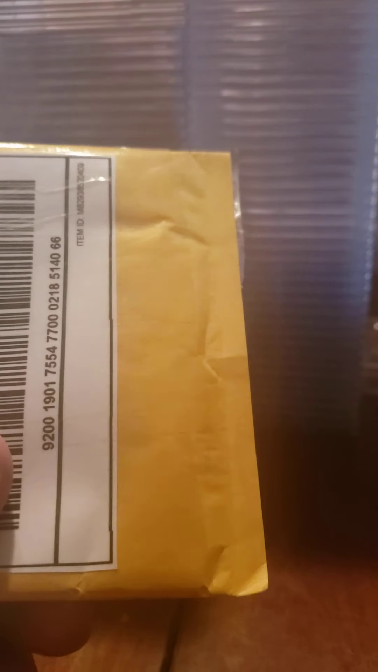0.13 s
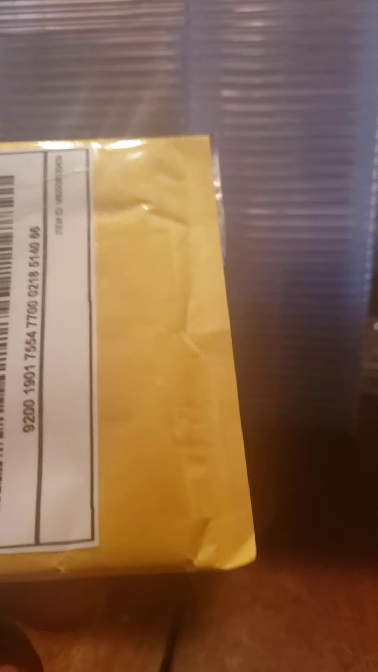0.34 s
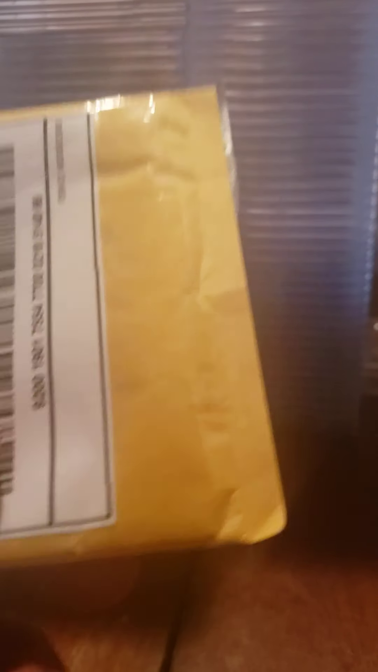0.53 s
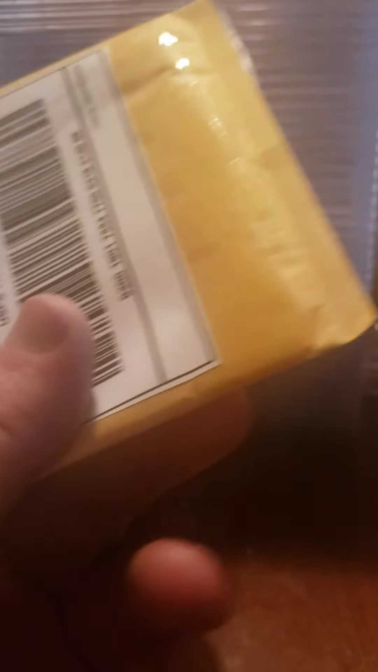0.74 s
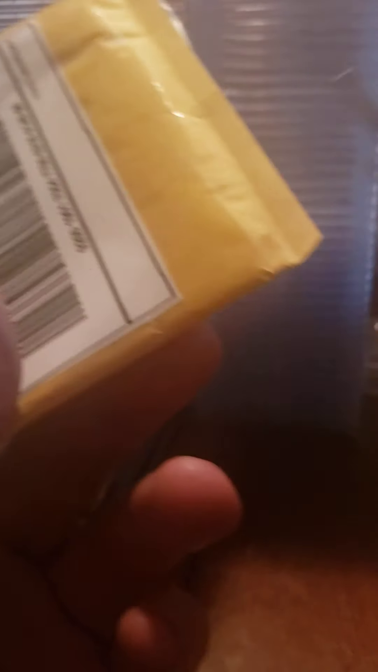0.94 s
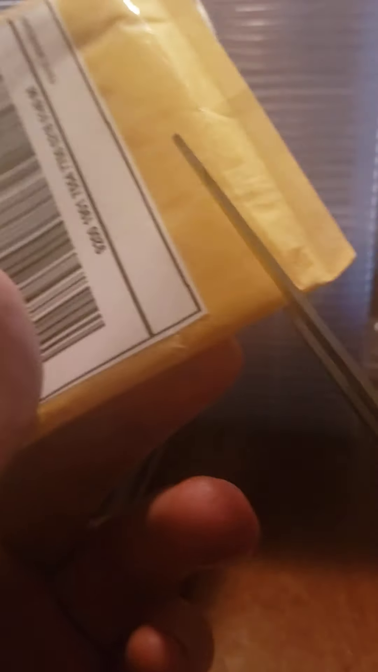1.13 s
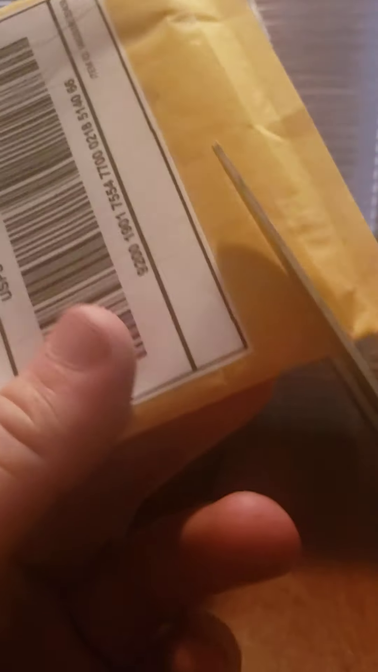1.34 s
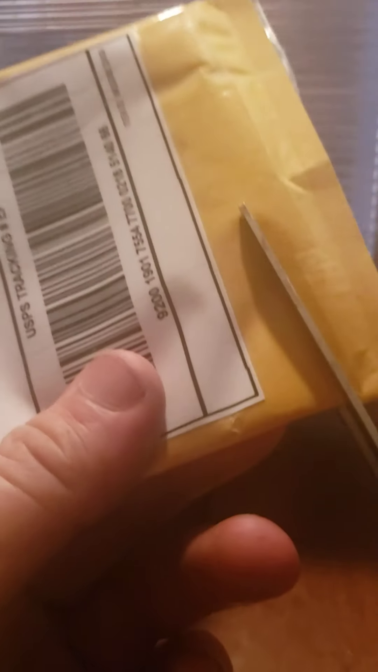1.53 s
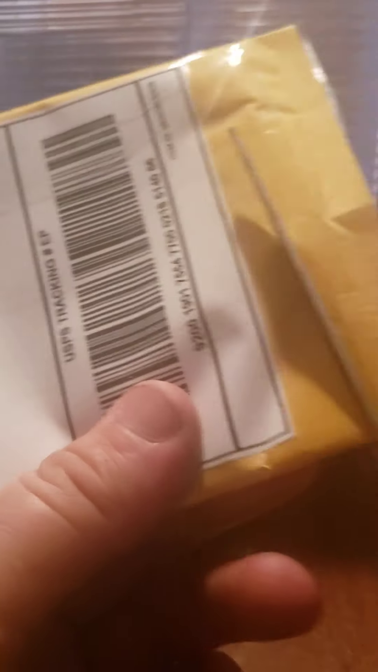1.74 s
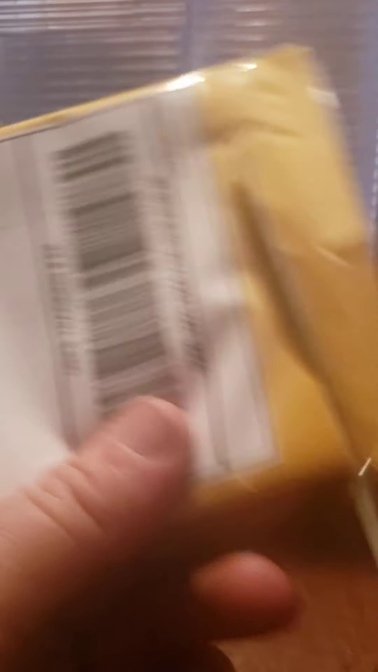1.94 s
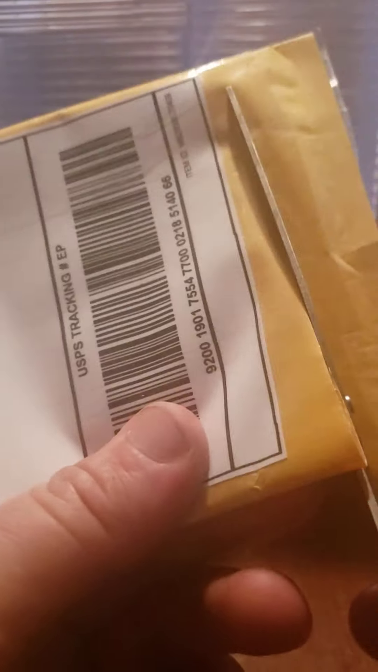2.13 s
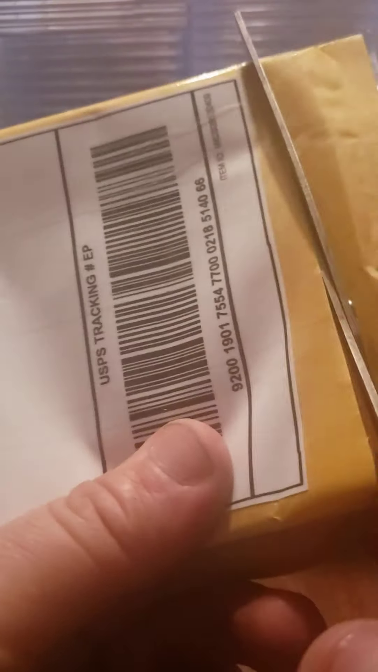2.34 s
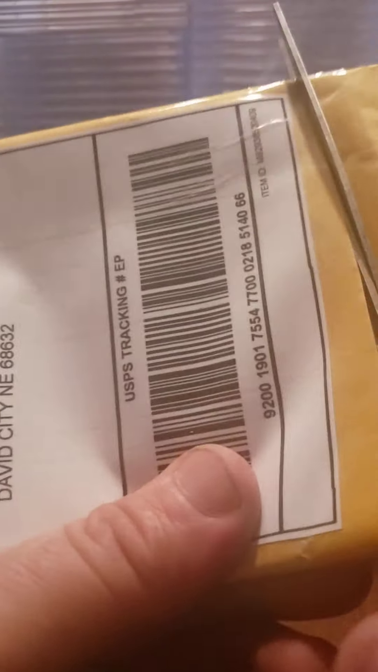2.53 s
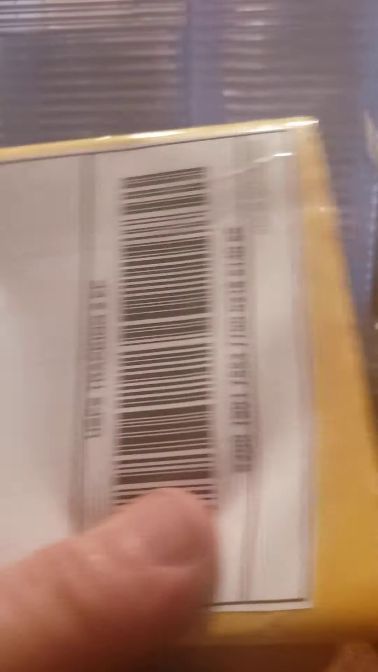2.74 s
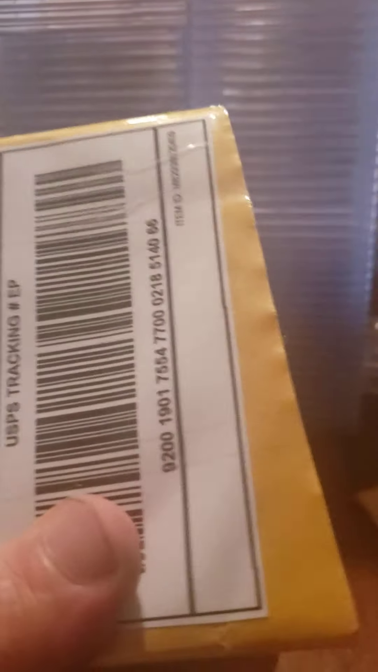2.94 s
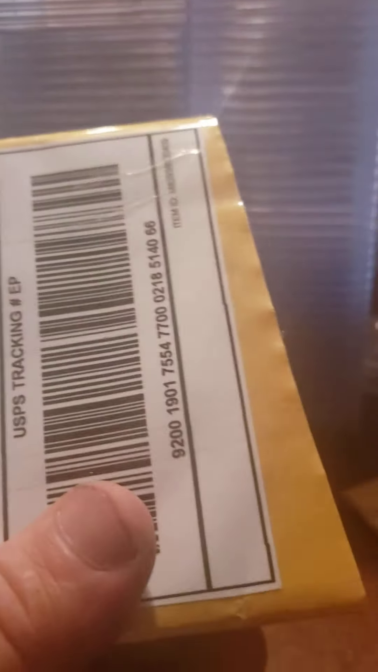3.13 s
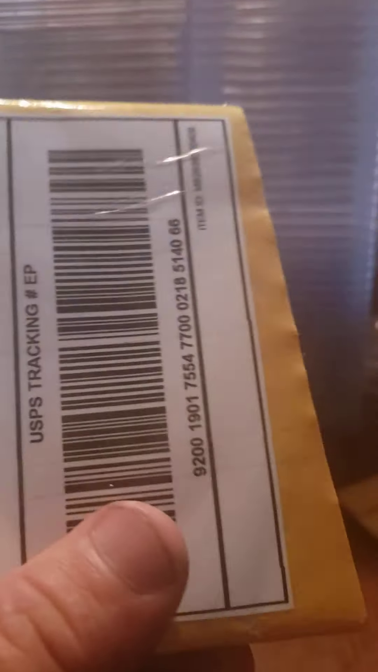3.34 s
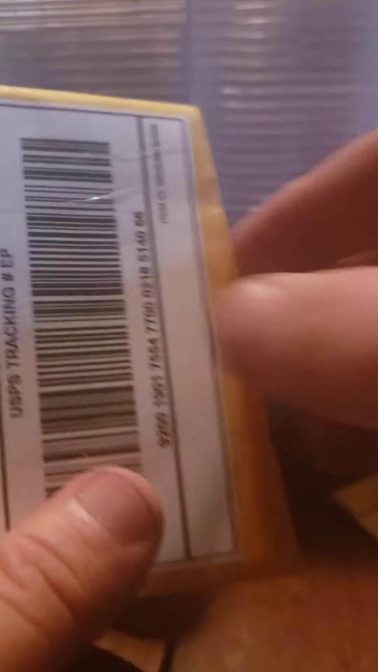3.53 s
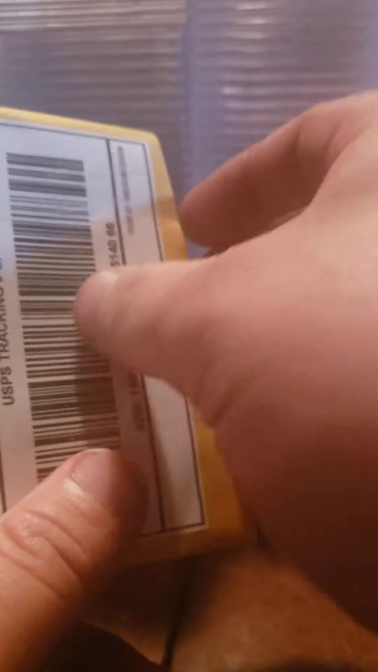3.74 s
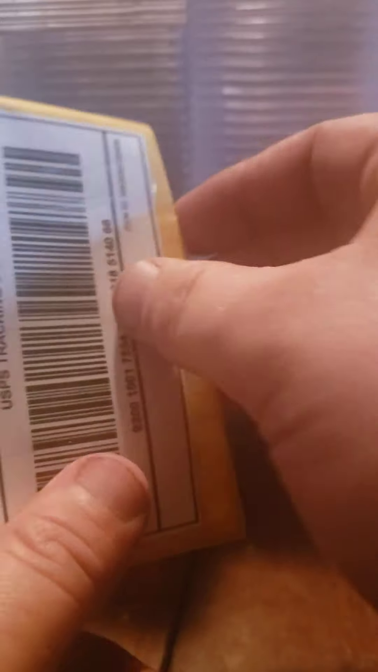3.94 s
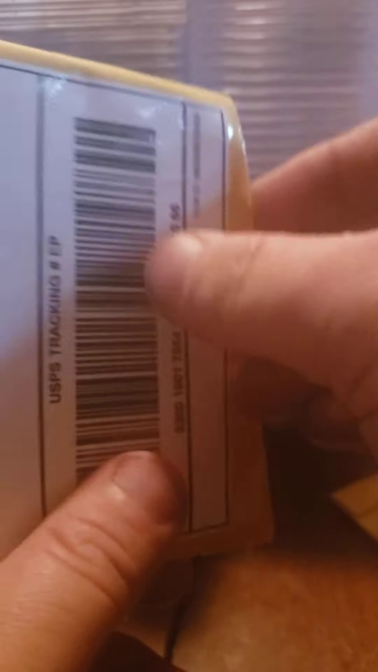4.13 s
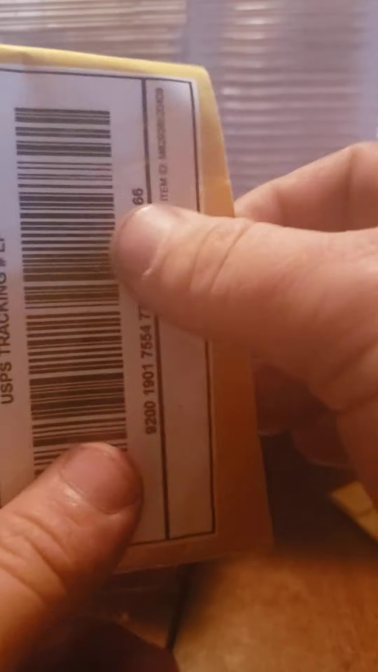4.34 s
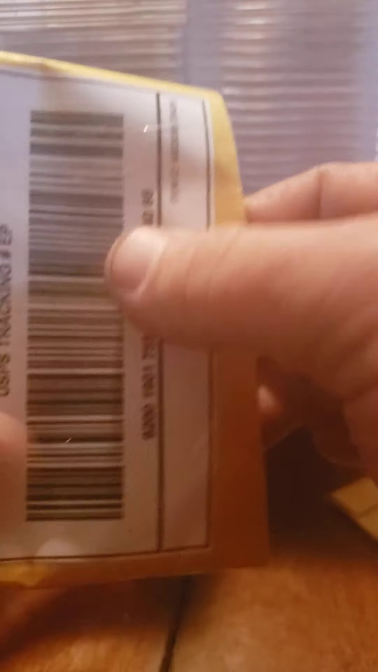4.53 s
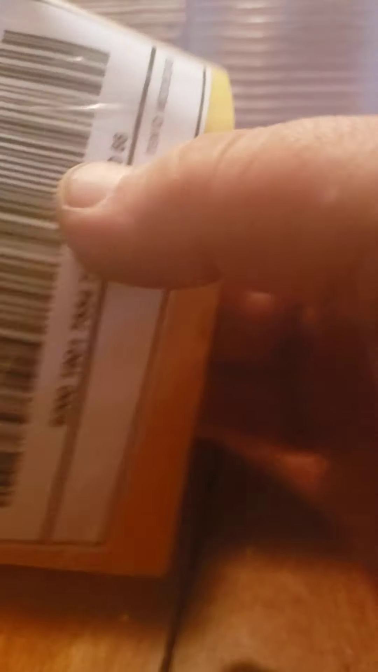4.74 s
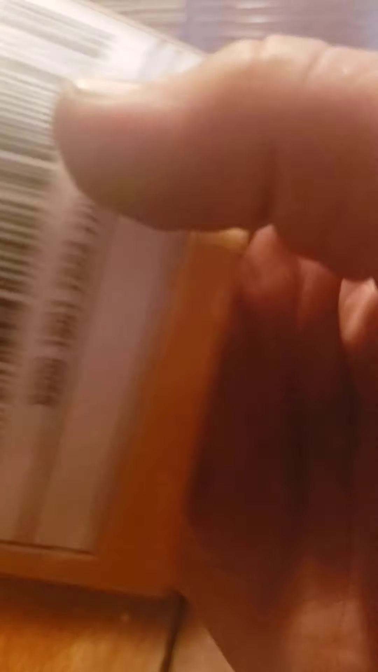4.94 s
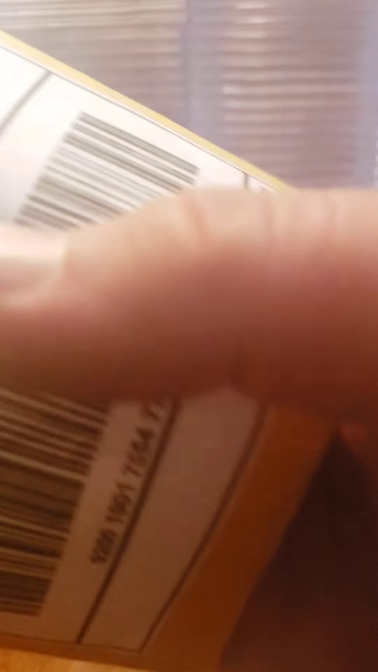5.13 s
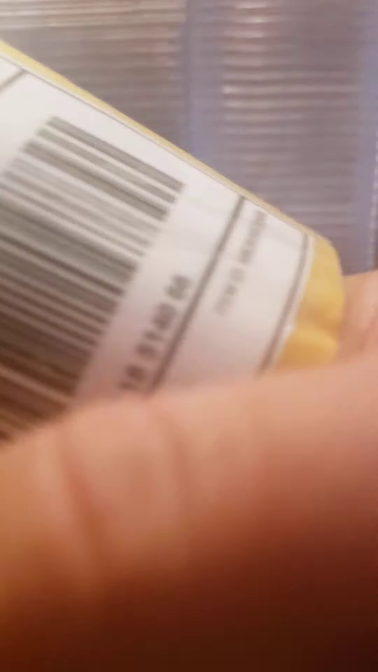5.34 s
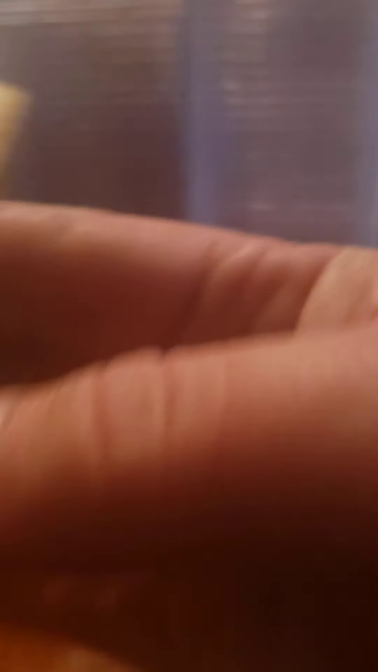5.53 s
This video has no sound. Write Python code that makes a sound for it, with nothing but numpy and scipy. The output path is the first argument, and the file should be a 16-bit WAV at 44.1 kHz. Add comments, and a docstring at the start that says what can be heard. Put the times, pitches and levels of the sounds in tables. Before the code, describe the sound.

Close, dry paper handling: soft crinkles, crunchy scissor cuts with two hard snaps, a metallic clack on wood, then heavier crackling and tugging.

```python
"""In a quiet room, close to a phone, a padded paper envelope is turned in the hands, cut open and pulled apart.
Shaped noise under random grains makes the hiss and rasp of fingers and scissors; folds crack in short bursts.
Resonances ring the hollow pouch, damped sines pop its wall and thump the grip, low noise carries the hands.
The scissors clatter onto a table through broad steel resonances; a short room tail and a steady hush lie behind."""
import sys
import numpy as np
from scipy import signal
from scipy.fft import rfft, irfft, next_fast_len
from scipy.io import wavfile
from scipy.ndimage import uniform_filter1d, map_coordinates

SR = 44100
rng = np.random.default_rng(int(sys.argv[2]) if len(sys.argv) > 2 else 0)


def volts_from_db(level):
    """Convert decibel levels to linear amplitude ratios."""
    exponent = np.asarray(level, float) / 20
    return 10 ** exponent


def transcribe(u):
    """Save the signal u as a 16-bit wav file named by the first command-line argument.

    u: samples, shape (n,) or (channels, n), limited to [-1, 1]; the rate is SR.
    q: integer samples, one column per channel.
    """
    v = np.clip(np.atleast_2d(u).T, -1, 1)
    q = np.round(v * 32767).astype(np.int16)
    wavfile.write(sys.argv[1], SR, q)


N = 246253
TIME = np.arange(N) / SR


def unit(x):
    """Scale to rms 1."""
    return x / np.sqrt(np.mean(x ** 2))


def colour(x, points):
    """Shape noise by (frequency [Hz], level [dB]) points, then scale to rms 1."""
    hz, db = np.transpose(points)
    size = next_fast_len(N)
    f = np.maximum(np.arange(size // 2 + 1) * SR / size, 1)
    gain = volts_from_db(np.interp(np.log(f), np.log(hz), db))
    return unit(irfft(rfft(x, size) * gain, size)[..., :N])


def ring(x, hz, width_hz):
    """Two-pole resonance, gain 1 at the centre."""
    return signal.lfilter(*signal.iirpeak(min(hz, .4 * SR), max(hz / width_hz, .3), fs=SR), x)


def pair(alike):
    """Noise for two microphone ports that share only a part."""
    a, b = rng.standard_normal((2, N))
    return np.array([a, alike * a + np.sqrt(1 - alike ** 2) * b])


def walk(rate):
    """Random levels that glide to a new value every 1 / rate s; spread a little under 1."""
    k = int(SR / rate)
    held = np.repeat(rng.standard_normal(N // k + 1), k)
    return uniform_filter1d(held, k)[:N]


def swell(t, rise_ms):
    """Grows to 1 in rise_ms, then dies away exponentially with the same time constant."""
    u = t * 1000 / np.clip(rise_ms, .1, 30)
    return u * np.exp(1 - u)


def grains(rate, spread_db, rise_s):
    """Envelope of many fibres letting go at random: most faint, a few strong."""
    when = rng.random(N) < rate / SR
    size = rng.exponential(size=N)
    t = np.arange(SR // 20) / SR
    releases = when * volts_from_db(spread_db * np.minimum(size, 3))
    return unit(np.convolve(releases, swell(t, 1000 * rise_s))[:N])


def stroke(t, start, end, start_db, end_db, grab_s, let_go_s):
    """Level of one drag: sets in, changes evenly in dB, lets go."""
    onset = 1 / (1 + np.exp(np.clip((start - t) / grab_s, -40, 40)))
    release = 1 / (1 + np.exp(np.clip((t - end) / let_go_s, -40, 40)))
    return onset * release * volts_from_db(np.interp(t, [start, end], [start_db, end_db]))


def add(out, s, sound):
    """Mix a short sound in at time s."""
    i = int(s * SR)
    out[:, i:i + sound.shape[-1]] += sound[..., :N - i]


# how busy the fingers are and how hard they press: (time [s], hiss level [dB], pressure [dB])
HANDLING = [(0, -53.5, -1), (.12, -61.5, 0), (.3, -55, -0.5), (.5, -61, -3.5), (.76, -63, 2.5),
            (.95, -66, 0), (1.04, -68.5, -19), (1.17, -82, -10), (1.21, -67, -10), (1.3, -57.5, -8.5),
            (1.43, -54.5, -29), (1.62, -63, -38), (1.95, -54.5, -6.5), (2.45, -59, -4.5), (2.64, -46, -17),
            (2.8, -53, -11), (3.15, -64, -6), (3.3, -56.5, 0), (3.57, -72.5, -1), (3.95, -65.5, -4),
            (4.17, -58, 0), (4.3, -60, -4.5), (4.7, -49.5, -4), (4.81, -49.5, -7), (5.1, -48, -7),
            (5.35, -54.5, 1.5), (5.47, -47, -9.5), (5.58, -43.5, -11)]
# a finger drags over the paper: (start [s], end [s], level at start [dB], level at end [dB], pressure [dB])
RUBS = [(0.213, 0.292, -59, -59, -2), (.307, 0.317, -38, -35.5, -7), (0.373, 0.418, -52.5, -49, -5),
        (0.384, .406, -51, -57.5, 12), (0.407, 0.436, -57, -49, -7), (0.776, 0.834, -51.5, -56.5, -5.5),
        (2.887, 2.979, -50, -65.5, -4), (3.02, 3.117, -58.5, -63.5, 4.5),
        (3.619, 3.685, -63.5, -61.5, -15.5), (3.77, 3.814, -66.5, -55.5, -6.5),
        (3.832, 3.92, -67, -49.5, -11), (3.988, 4.031, -58.5, -58, 2), (4.05, 4.138, -50, -50.5, -2.5),
        (4.331, 4.415, -62, -46, 1), (4.411, 4.478, -44.5, -50, -3.5), (4.516, 4.595, -60.5, -64, 10),
        (4.625, 4.725, -73, -59, -5), (4.83, 4.939, -49, -51.5, 4), (4.967, 5.037, -48.5, -43, -1.5),
        (5.096, 5.245, -49, -48.5, -8), (5.258, 5.335, -47, -58.5, 5), (5.496, 5.592, -53, -65, 14)]


def fingers():
    """Gain of the fingers' hiss, and their pressure in dB: steady handling with drags on top."""
    s, hiss_db, press_db = np.transpose(HANDLING)
    gain = volts_from_db(np.interp(TIME, s, hiss_db) + 2.0 * walk(10))
    pressed = gain * np.interp(TIME, s, press_db)
    for start, end, start_db, end_db, drag_db in RUBS:
        drag = stroke(TIME, start, end, start_db, end_db, grab_s=0.002, let_go_s=0.0035)
        gain = gain + drag
        pressed = pressed + drag * drag_db
    return gain, pressed / gain


# skin on the glossy label is brighter than on bare paper: (time [s], sheen level over the hiss [dB])
SHEEN = [(0, -12), (.2, -8), (.3, -5.5), (.4, 3.5), (.55, -13), (.8, 6), (1.1, -23), (1.4, -24.5),
         (2.6, -6.5), (3.0, -5.5), (3.5, -15), (4.2, -12), (5.58, -11.5)]
# relative to the hiss; both grow with pressure, the hollow ring by HOLLOW_PER_DB dB for each dB
RASP_DB, HOLLOW_DB, HOLLOW_PER_DB = -1, -6.5, 0.72


def rustle(busy, press_db):
    """Uneven, grainy handling; the harder the grip, the more large crackles reach all three voices."""
    force_db = 20 * np.log10(busy) + press_db
    crackle = grains(90, 5.0, .0007) * np.interp(force_db, [-66, -48], [.3, 1.5])
    fine = (1 + .35 * grains(300, 4.0, .001) + .15 * crackle) * volts_from_db(1.5 * walk(40))
    middle = .7 + .3 * grains(150, 4.0, .0012) + .4 * crackle
    coarse = 0.48 + .5 * grains(75, 6.1, 0.00073) + 0.33 * crackle
    hiss, rasp, hollow = voices(fine, middle, coarse)
    sheen = unit(ring(ring(hiss, 12500, 8200), 12500, 8200))
    sheen = sheen * volts_from_db(np.interp(TIME, *np.transpose(SHEEN)))
    rasp = rasp * volts_from_db(RASP_DB + press_db)
    hollow = hollow * volts_from_db(HOLLOW_DB + HOLLOW_PER_DB * press_db)
    return busy * (ring(hiss, 4500, 9700) + sheen + rasp + hollow)


# tone of the fibres: (frequency [Hz], relative level per Hz [dB])
FIBRE = [(1470, -40), (2500, 0.5), (5050, 2), (6100, -1.5), (6600, 2.5), (8910, -3.5), (11700, 0),
         (15100, -1.5), (16100, -12.5), (16500, -51.5)]


def voices(fine, middle, coarse):
    """Hiss, rasp and hollow ring of dragged paper, each under its own stick-slip grain."""
    hiss = unit(colour(pair(0.18), FIBRE) * fine)
    rasp = ring(pair(0.12) * middle, 1790, 2000)
    rasp = unit(ring(rasp, 2000, 2200) + 0.42 * ring(rasp, 2300, 400) + 0.55 * ring(rasp, 1650, 300))
    return hiss, rasp, unit(pouch(ring(pair(0.92) * coarse, 510, 1100)))


# air and walls of the pouch: (frequency [Hz], width [Hz], level [dB])
POUCH = [(614, 110, -4.5), (749, 160, -5), (820, 67, -15)]


def pouch(x):
    """The hollow envelope answers any push with its resonances."""
    return sum(volts_from_db(db) * ring(x, hz, width) for hz, width, db in POUCH)


# the blades close through the paper:
# (start [s], end [s], level at start [dB], level at end [dB], hollow ring relative to the cut [dB])
CUTS = [(1.441, 1.494, -46.5, -44.5, -12.5), (1.471, 1.592, -38.5, -47.5, -12),
        (1.657, 1.751, -38.5, -40, -8), (1.769, 1.811, -47, -37.5, -12), (1.823, 1.895, -34.5, -38.5, -1.5),
        (1.985, 2.013, -41, -34, -4.5), (2.011, 2.051, -32, -35, -11.5), (2.086, 2.171, -36, -37, -4),
        (2.235, 2.302, -34.5, -36.5, -4), (2.32, 2.399, -29.5, -46, -5), (2.478, 2.512, -41.5, -39.5, -1),
        (2.545, 2.551, -30.5, -46, 0), (2.566, 2.563, -42, -30.5, 1.5), (2.579, 2.584, -43, -30, -6.5),
        (2.666, 2.713, -32.5, -50, -7)]
# stretched paper under the blades: (frequency [Hz], width [Hz], mid level [dB])
SING = [(2670, 100, -16.5), (4750, 350, -13.5), (6380, 250, -24.5), (11900, 1500, -8.5)]


def cuts():
    """Dense rasps that start and stop within a few ms; the stretched paper sings in a few bands."""
    fine = (1 + .45 * grains(300, 5.0, .0006)) * volts_from_db(1.6 * walk(150))
    middle = fine * volts_from_db(5.4 * walk(120))
    coarse = 0.25 + 1.4 * grains(94, 4.6, 0.0033)
    hiss, rasp, hollow = voices(fine, middle, coarse)
    sing = sum(volts_from_db(db + 7.17 * walk(3.7)) * unit(ring(pair(0.1), hz, width)) for hz, width, db in SING)
    edge, ringing = 0, 0
    for start, end, start_db, end_db, hollow_db in CUTS:
        close = stroke(TIME, start, end, start_db, end_db, grab_s=0.0027, let_go_s=0.0046)
        edge = edge + close
        ringing = ringing + close * volts_from_db(hollow_db)
    return edge * (hiss + sing + volts_from_db(-7) * rasp) + ringing * hollow


# folds that snap:
# (time [s], flap peak [dB], flap pitch [Hz], treble peak over the flap [dB], left minus right [dB])
CRACKS = [(0.21, -43, 5320, 2, -1.5), (0.2192, -36.5, 1830, -12, -6), (0.2488, -33, 1200, 6, -1.5),
          (0.308, -45, 1800, 5, -2.0), (0.4123, -26, 7480, 15.5, -3), (0.477, -44.5, 4960, -22, 8),
          (0.9443, -46, 4670, -2, 3.5), (1.037, -48, 4660, -24, 12), (1.185, -51, 3520, -26, 14),
          (1.297, -44.5, 3500, -22, 19), (1.4037, -39.5, 3985, -13, 6), (1.4214, -40, 2670, 0, 8),
          (1.479, -26, 2770, -14, 8), (1.5115, -26, 4590, 0, -4), (1.5436, -23.5, 2670, -13, 3),
          (1.8028, -35, 2810, 1, 2), (1.8402, -19.5, 2530, -10, 9), (1.8671, -17.5, 1420, -3, -3),
          (1.8873, -25.5, 1300, -10, 15), (2.1176, -17, 1270, -8, 5.5), (2.1421, -19.5, 2600, -14, 12),
          (2.1654, -28, 2670, -10, -1), (2.2713, -21, 1280, -11, 4), (2.3331, -25, 3660, -24, 11),
          (2.481, -39, 1470, -12, 8), (2.5371, -36, 1880, -12, -4), (2.5935, -29, 7610, -10, 10),
          (2.6143, -8.5, 5070, -0.5, 9), (2.6594, -9, 1960, -23, 9.5), (2.6629, -8, 2290, 5.5, 4),
          (2.818, -28.5, 2520, -11, 0.5), (2.886, -13, 8800, -9, -2), (3.0036, -22, 1710, -30, -6.0),
          (3.0238, -22, 8300, -24, 0.0), (3.0917, -35.5, 7120, -7, 0.0), (3.1835, -14, 2970, -22, -1),
          (3.7815, -42, 3520, -10, 4), (3.9005, -41, 6820, -16, 3.5), (4.0123, -43, 2220, -18, 2),
          (4.0675, -34, 2930, -14, -4), (4.1292, -30.5, 6030, -15, 5.0), (4.4164, -49, 2590, -10, 6),
          (4.4594, -45, 2540, -16, 2.5), (4.5388, -30, 2080, -1, 3.5), (4.574, -39, 2080, -16, 3),
          (4.582, -34, 1950, -13, 12), (4.633, -46, 2130, -19, 4), (4.656, -37, 2140, -14, 2),
          (4.8157, -31, 1530, -10, 7), (4.839, -22.5, 2530, -19, 7), (4.8532, -32, 1550, -19, 9),
          (4.8759, -20.5, 1410, -23, 9.5), (4.887, -27, 2760, -20, 10), (4.9175, -32, 1600, -16, 5),
          (5.1078, -22, 2740, -6, 21.5), (5.172, -42, 4580, -16, 5.0), (5.1879, -36, 1601, -10, 4.0),
          (5.2209, -23, 2410, -20, 13.5), (5.242, -28, 3560, -14, 9), (5.251, -34, 1680, -15, 9),
          (5.2754, -32, 1260, -31, -4), (5.2977, -23, 1630, -32, 17.5), (5.3275, -30, 1640, -27, 12),
          (5.3832, -32.5, 2200, -26, 22)]
RISE_MS, FASTER_PER_DB = 1.155, .02  # rise at -33 dB; harder snaps are quicker


def cracks(busy):
    """Each fold gives a few ms of noise, coloured by the flap that snaps, and a faint settling rustle."""
    out, t = np.zeros((2, N)), np.arange(SR // 20) / SR
    for s, peak_db, hz, top_db, pan_db in ticks(busy) + list(CRACKS):
        noise = rng.standard_normal((3, len(t)))
        snap = swell(t, RISE_MS * np.exp(-FASTER_PER_DB * (peak_db + 33)))
        settling = .04 * swell(t, 3.4)
        burst = (noise[0] + .5 * noise[1:]) * (snap + settling)
        flap = ring(ring(burst, hz, hz), hz, hz) + 0.24 * ring(burst, 4600, 6400)
        top = ring(burst, 12000, 6100)
        crack = flap / np.abs(flap).max() + volts_from_db(top_db) * top / np.abs(top).max()
        side = volts_from_db(np.array([[pan_db], [-pan_db]]) / 2)
        add(out, s, side * volts_from_db(peak_db) * crack)
    return out


# a slowly bent crease ticks densely, a crumpled one lower:
# (start [s], end [s], mid level [dB], mid pitch [Hz])
CREAKS = [(0.877, 1.13, -56, 4500), (1.298, 1.46, -47.5, 3870), (1.597, 1.65, -41.5, 4830),
          (2.41, 2.46, -40, 3460), (2.926, 3.0, -41, 4800), (4.151, 4.33, -46, 5000),
          (4.361, 4.48, -42, 1880), (4.847, 5.02, -30.5, 1470), (5.131, 5.3, -28.5, 1480)]
CREAK_PER_S = 55
# small creases that tick at random: mid level over the fingers' gain, spread either way, pitch, treble
TICK_OVER_HISS_DB, TICK_SPREAD_DB, TICK_HZ, TICK_TOP_DB = 11, 3, 4010, -7


def ticks(busy, count=40):
    """Rows for small creases: anywhere as loud as the fingers are busy, and densely in each creak."""
    s = rng.random(count) * (N - 1) / SR
    base_db = 20 * np.log10(busy[(s * SR).astype(int)]) + TICK_OVER_HISS_DB
    hz = np.full(count, float(TICK_HZ))
    for start, end, creak_db, creak_hz in CREAKS:
        when = np.arange(start, end, 1 / CREAK_PER_S)
        s = np.append(s, when + rng.random(len(when)) / CREAK_PER_S)
        base_db = np.append(base_db, creak_db + 0 * when)
        hz = np.append(hz, creak_hz + 0 * when)
    size, tone, lean = rng.random((len(s), 3)).T
    level_db = base_db + TICK_SPREAD_DB * (2 * size - 1)
    pitch_hz = hz * 2 ** (tone - .5)  # within half an octave either way
    return list(zip(s, level_db, pitch_hz, TICK_TOP_DB + 0 * s, 8 * lean - 2))


# the pouch wall pops in and out: (time [s], level [dB], pitch [Hz], rise [ms])
POPS = [(0.251, -42, 695, 2), (0.307, -36, 767, 3.64), (0.414, -33, 770, 3.88), (1.186, -50.5, 620, 1.5),
        (1.293, -48, 600, 2.7), (1.473, -42, 400, 2.9), (1.683, -44, 837, 2.8), (1.736, -38, 730, 2.6),
        (1.803, -39, 540, 2.4), (1.822, -32, 684, 2.6), (1.837, -26, 800, 2.2), (1.852, -23, 740, 1.85),
        (1.871, -24, 647, 1.7), (1.884, -34.5, 610, 3.5), (1.997, -35, 860, 2.9), (2.085, -34, 572, 3.4),
        (2.1, -32, 668, 2.2), (2.12, -19.5, 732, 2.2), (2.141, -23.5, 724, 1.6), (2.165, -33.5, 620, 2.8),
        (2.232, -38, 633, 2.4), (2.273, -24, 588, 1.9), (2.29, -41, 680, 2.1), (2.325, -30, 602, 1.9),
        (2.356, -39.5, 890, 2.3), (2.376, -35, 430.4, 1.9), (2.541, -38, 580, 1.9), (2.613, -26, 527, 2.1),
        (2.661, -21, 405, 1.87), (2.815, -47.5, 730, 2.1), (2.886, -40.5, 893, 2.2),
        (3.004, -41.5, 720, 3.3), (3.185, -38, 754, 2.44), (4.009, -45.5, 916, 2.25),
        (4.055, -40, 890, 2.7), (4.124, -29, 388, 2), (4.374, -35.5, 665, 2.5), (4.539, -33.5, 760, 2.3),
        (4.662, -38, 357, 2), (4.852, -34.5, 950, 2), (4.874, -35, 954, 1.64), (4.886, -33.5, 950, 2.4),
        (5.003, -33.5, 354, 2.7), (5.108, -34.5, 665, 1.85), (5.137, -43, 960, 2.1), (5.241, -33, 815, 2.7),
        (5.297, -25, 737, 1.96), (5.327, -30, 787, 2.7), (5.333, -33, 925, 1.9), (5.38, -38.5, 706, 1.3)]


def pops():
    """A few rough cycles of the air in the pouch: a swelling sine with narrow noise at its pitch."""
    out, t = np.zeros((2, N)), np.arange(SR // 10) / SR
    for s, level_db, hz, rise_ms in POPS:
        wobble = ring(rng.standard_normal(len(t)), hz, 320)
        tone = np.sin(2 * np.pi * hz * t) + 3.54 * wobble
        add(out, s, volts_from_db(level_db) * swell(t, rise_ms) * tone)
    return out


# a grip shifts and the whole envelope flexes: (time [s], level [dB], pitch [Hz], fade time constant [ms])
THUMPS = [(0.406, -50, 142, 62), (0.687, -45, 129, 37), (1.476, -57, 295, 50), (1.867, -52, 68.4, 19),
          (2.138, -47, 78, 14.0), (2.261, -44, 146, 14), (2.615, -29, 145, 8.8), (2.662, -18.5, 178, 4.6),
          (2.677, -30, 56.5, 13), (4.128, -39.5, 124, 23), (4.379, -54, 116, 9.2), (4.441, -38.5, 208, 5.9),
          (4.572, -46, 88, 17), (4.665, -33, 115.2, 4.3), (4.728, -46, 305, 10), (4.878, -30, 148, 17.5),
          (4.925, -40, 81, 13.7), (5.006, -33, 71.4, 30), (5.106, -32, 76, 18), (5.192, -28.5, 134, 4.4),
          (5.242, -41, 128, 34), (5.295, -23, 335.4, 2), (5.382, -29.5, 112.1, 5.1), (5.499, -39, 321, 8.6)]


def thumps():
    """Damped slow swings that reach the two ports a little out of step."""
    out, t = np.zeros((2, N)), np.arange(SR // 4) / SR
    for s, level_db, hz, fade_ms in THUMPS:
        skew = (0.15 + 0.27 * rng.standard_normal()) * np.array([[1], [-1]])  # radians
        swing = np.sin(2 * np.pi * hz * t + skew) * (1 - np.exp(-t / 0.00022))
        add(out, s, volts_from_db(level_db) * swing * np.exp(-1000 * t / fade_ms))
    return out


# the hands heave the envelope: (time [s], rumble level [dB], flutter level [dB])
HEAVES = [(0.421, -54, -57), (.65, -59, -52.5), (1.2, -66, -66.5), (1.52, -56, -52.5), (1.68, -71, -83),
          (1.74, -62, -64), (1.89, -55.5, -84), (2.14, -47, -65), (2.378, -57, -53.5), (2.56, -61, -55),
          (2.67, -45, -66), (3.35, -48, -52.5), (3.809, -68, -62.5), (4.14, -48.5, -58), (4.39, -48, -47),
          (4.58, -63, -59), (4.71, -50.5, -64), (4.84, -49, -59), (4.93, -58, -61), (5.03, -43, -75),
          (5.12, -57, -72), (5.21, -56, -46), (5.37, -47.5, -53), (5.53, -47.5, -85)]
# tone of the fluttering sheet: (frequency [Hz], relative level per Hz [dB])
SHEET = [(90, -35.5), (160, 2.5), (260, 5), (380, 1.5), (480, -16), (700, -41.5)]
# tone of the hands' rumble: (frequency [Hz], relative level per Hz [dB])
HAND = [(20, -22.5), (40, -19.5), (66, -3), (95, -11.5), (130, -5), (200, -49.5)]
HEAVE_RISE_S, HEAVE_FALL_S = 0.027, 0.037  # time constants
FLUTTER_DB, RUMBLE_DB = -5.5, -23.5  # relative to the fingers' gain times pressure


def hands(busy, press_db):
    """The sheet flutters low and the hands rumble through it, a little always and more at each heave."""
    weight = uniform_filter1d(busy * volts_from_db(press_db), SR // 20)
    flutter = volts_from_db(FLUTTER_DB) * weight
    rumble = volts_from_db(RUMBLE_DB) * weight + volts_from_db(-75)
    for s, rumble_db, flutter_db in HEAVES:
        heave = np.exp(-np.where(TIME < s, (s - TIME) / HEAVE_RISE_S, (TIME - s) / HEAVE_FALL_S))
        flutter = flutter + volts_from_db(flutter_db) * heave
        rumble = rumble + volts_from_db(rumble_db) * heave
    sheet = unit(colour(pair(.8) * volts_from_db(2.5 * walk(50)), SHEET))
    return sheet * flutter + colour(pair(0.59), HAND) * rumble


# scissors landing and bouncing on the table: (time [s], level [dB])
DROP = [(3.2909, -20), (3.3024, -5), (3.3277, -26), (3.3467, -17.5), (3.3653, -22.5), (3.3784, -24.5),
        (3.395, -36), (3.412, -37)]
# blades and table top: (frequency [Hz], width [Hz], level [dB])
BLADES = [(741, 175, 5), (977, 120, -1.5), (1550, 830, -1), (1800, 180, -9.5), (2310, 530, -7.5),
          (3120, 1300, -8.5), (4230, 560, -6), (5000, 1300, -8), (6600, 1100, -17.5), (11600, 2900, -12)]


def scissors():
    """Steel on wood: each contact is a short rattle through broad, quickly damped resonances."""
    rattle, t = np.zeros((2, N)), np.arange(SR // 10) / SR
    softer = signal.butter(2, 5000, fs=SR)
    for k, (s, level_db) in enumerate(DROP):
        noise = rng.standard_normal((3, len(t)))
        hit = volts_from_db(level_db) * (noise[0] + 1.83 * noise[1:]) * swell(t, 0.81)
        if k >= 2:  # later contacts are softer, so duller
            hit = signal.lfilter(*softer, hit)
        add(rattle, s, hit)
    steel = sum(volts_from_db(db) * ring(rattle, hz, width) for hz, width, db in BLADES)
    return signal.lfilter(*signal.butter(2, 560, "high", fs=SR), steel)  # too small to carry bass


ROOM_T60_S, ROOM_TREBLE_T60_S = 0.26, 0.096


def room(x):
    """Diffuse tail of a small room, its treble dying first."""
    t = np.arange(int(.6 * SR)) / SR
    noise = rng.standard_normal((2, len(t))) * (1 - np.exp(-t / 0.00067))
    noise[1] += .5 * noise[0]  # the ports are close enough to share part of the tail
    low = signal.lfilter(*signal.butter(1, 3000, fs=SR), noise)
    low_tail = low * np.exp(-np.log(1000) * t / ROOM_T60_S)
    treble_tail = (noise - low) * np.exp(-np.log(1000) * t / ROOM_TREBLE_T60_S)
    tail = signal.lfilter(*signal.butter(2, 300, "high", fs=SR), low_tail + treble_tail)
    tail = tail / np.sqrt(np.sum(tail ** 2, 1, keepdims=True))
    return signal.fftconvolve(x, tail, axes=1)[:, :N]


# tone of the room's hush: (frequency [Hz], relative level per Hz [dB])
AIR = [(15, -46), (25, -12.5), (80, 6.5), (226, -2.5), (296, 3), (399, -7.5), (568, -2), (1030, -44),
       (3320, -11.5), (3810, -15.5), (7110, -26), (15200, -39.5), (16500, -47.5)]


def hush():
    """Steady shaped noise of the quiet room, its level drifting slowly around -67.5 dB."""
    return colour(pair(0.29), AIR) * volts_from_db(-67.5 + 1.9 * walk(3.0))


# where the envelope is: (time [s], left minus right [dB], left later by [ms])
PLACE = [(0, -2, 0.2), (.75, 2, 0.53), (1.25, 5, -0.16), (2.25, 4.5, -0.35), (2.75, 2, -0.18),
         (3.3, 0.5, 0.3), (3.749, 2.5, -.1), (4.5, 1.5, -0.29), (5.58, 4, -0.16)]


def scene():
    """Paper close by and nearly dry, scissors further off and wet, over the room's hush."""
    s, pan_db, late_ms = np.transpose(PLACE)
    lean = volts_from_db(np.interp(TIME, s, pan_db) * np.array([[.5], [-.5]]))
    busy, press_db = fingers()
    edge = (rustle(busy, press_db) + cuts()) * lean + cracks(busy)
    body = (hands(busy, press_db) + pops() + thumps()) * lean
    # the two ports are some way apart, so the sound reaches one of them later
    late = np.interp(TIME, s, late_ms) * SR / 1000  # samples
    edge[0] = map_coordinates(edge[0], [np.arange(N) - late], order=3)
    # the broad body of the pouch faces both ports, so its lag is smaller
    body[0] = map_coordinates(body[0], [np.arange(N) - 0.67 * late], order=3)
    paper = edge + body
    steel = scissors()
    wet = room(volts_from_db(-14.5) * paper + volts_from_db(-5.5) * steel)
    return paper + steel + wet + hush()


def band_limit(x):
    """A steep low-pass at the top of the band."""
    return signal.sosfilt(signal.butter(12, 16830, fs=SR, output="sos"), x)


def record(dry):
    """The phone rounds the loudest peaks and cuts the top above 16.3 kHz."""
    rounded = np.tanh(dry)
    top_cut = signal.ellip(8, .2, 70, 16300, fs=SR, output="sos")
    mix = signal.sosfilt(top_cut, rounded)
    return band_limit(mix)


dry = scene()
out = record(dry)
transcribe(out)
```